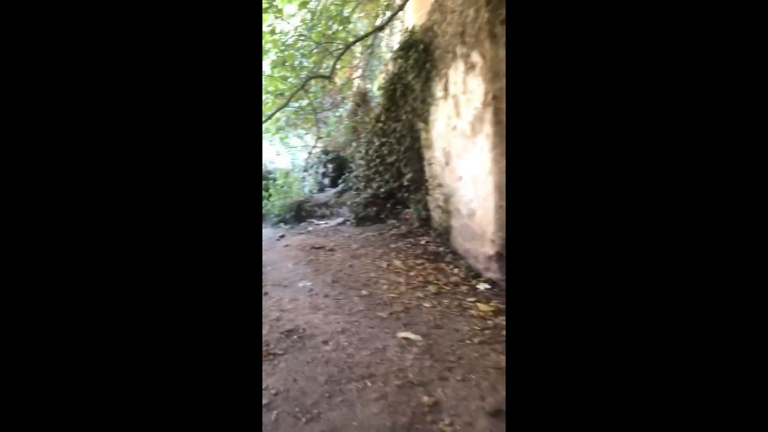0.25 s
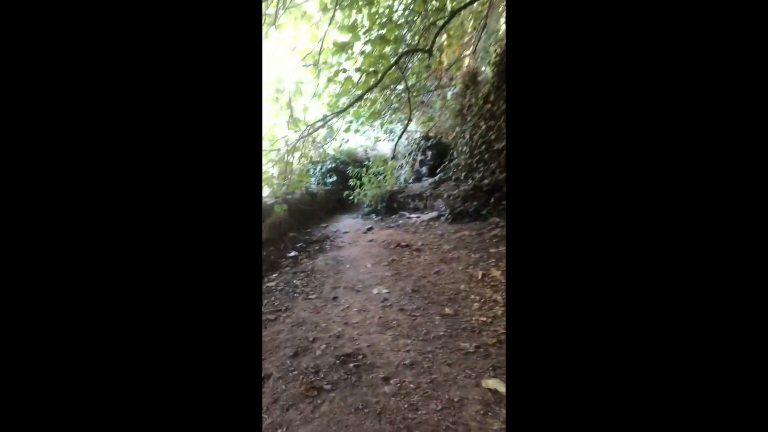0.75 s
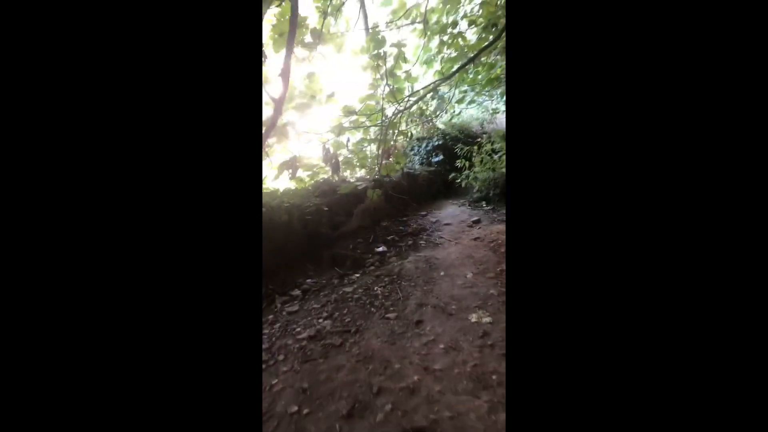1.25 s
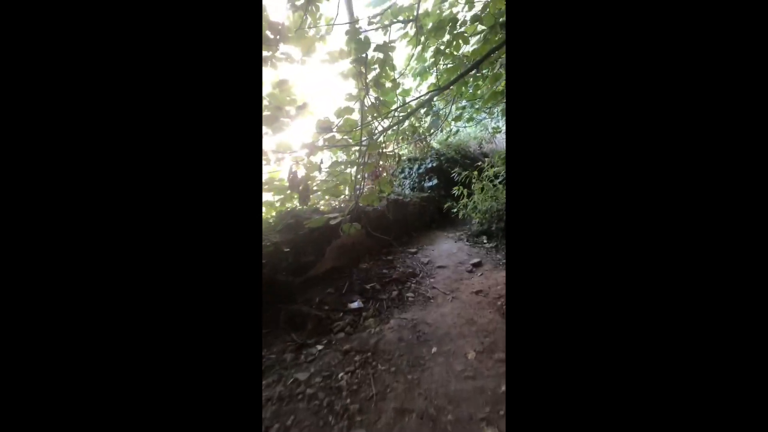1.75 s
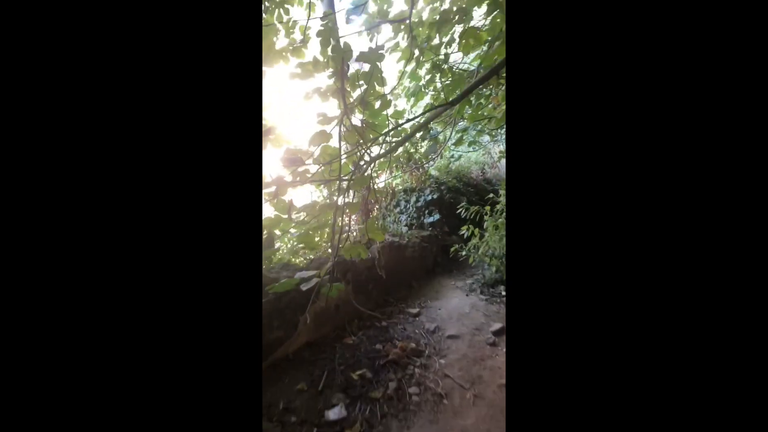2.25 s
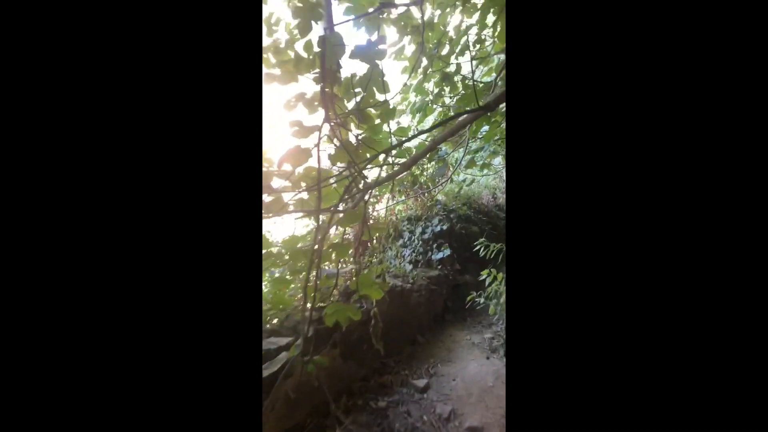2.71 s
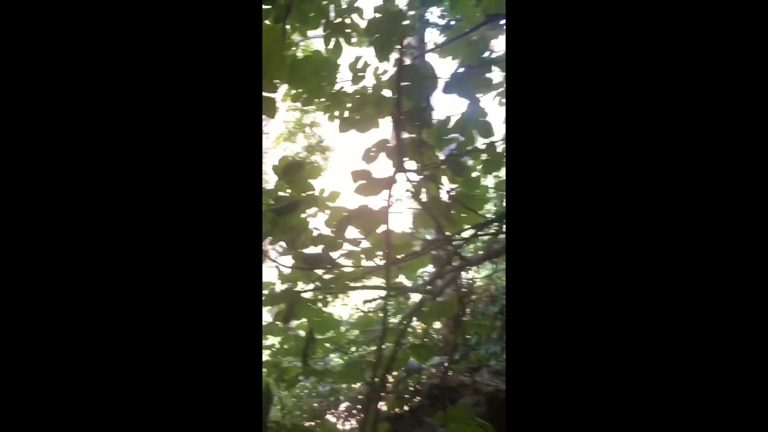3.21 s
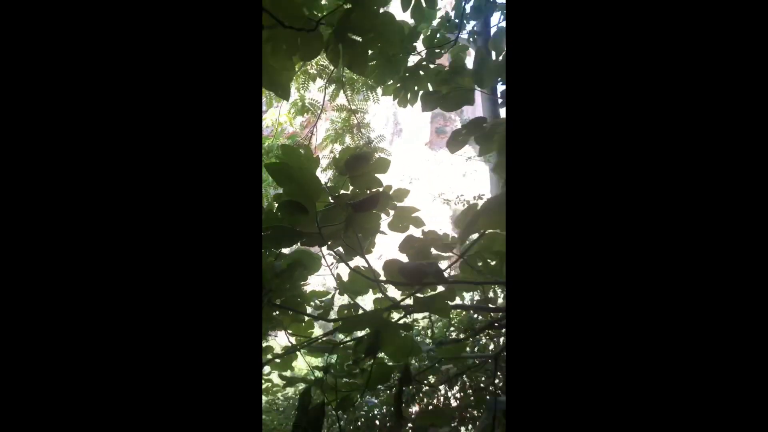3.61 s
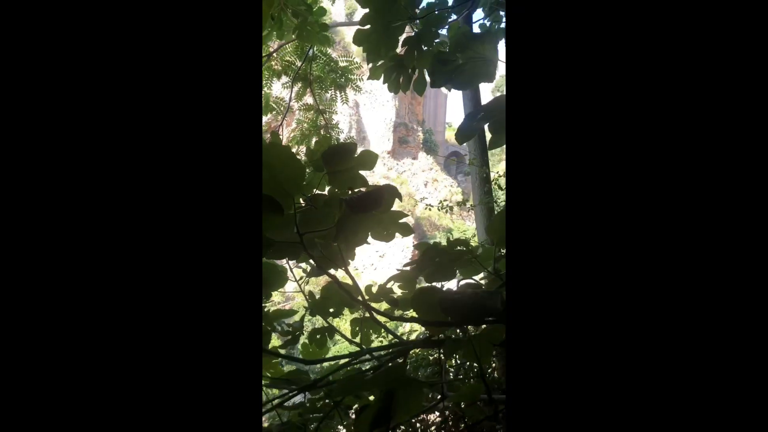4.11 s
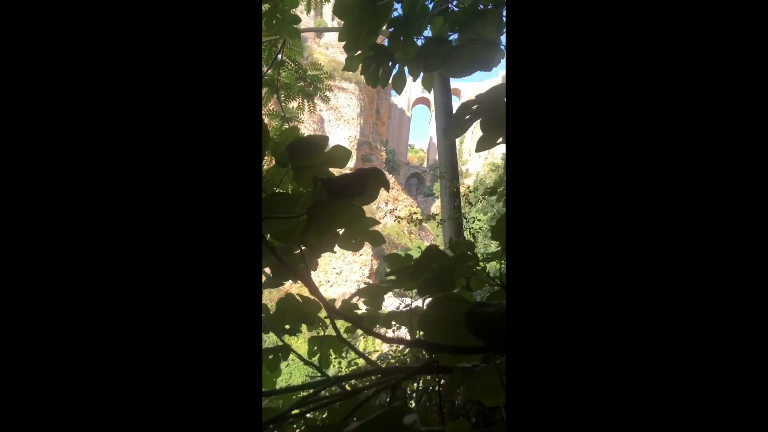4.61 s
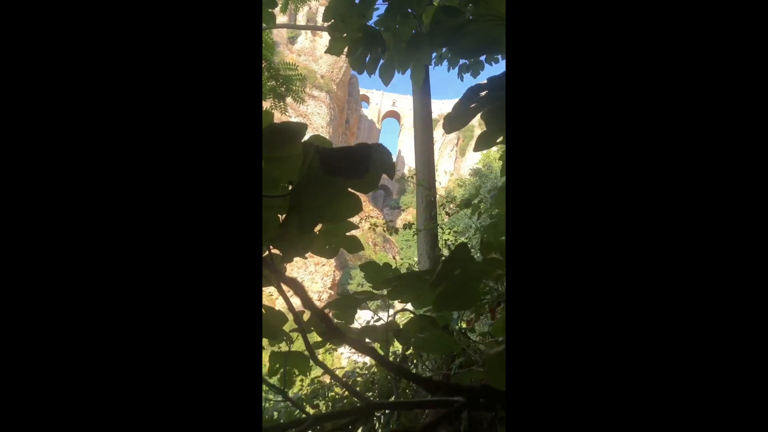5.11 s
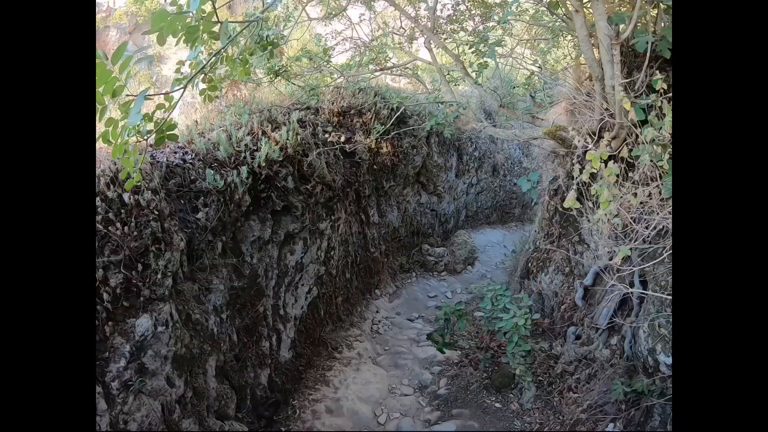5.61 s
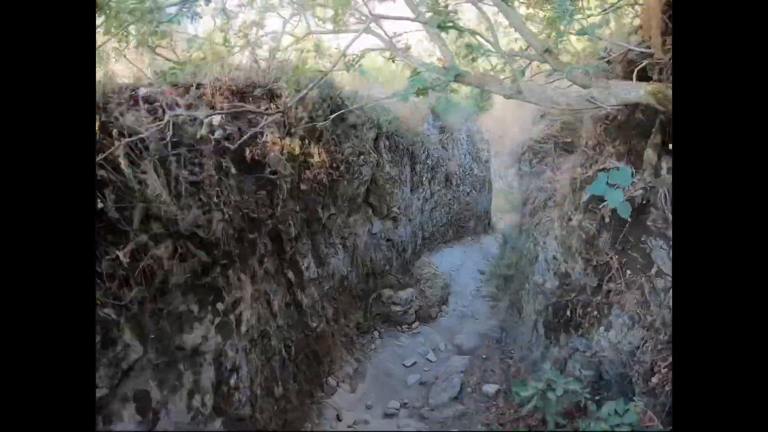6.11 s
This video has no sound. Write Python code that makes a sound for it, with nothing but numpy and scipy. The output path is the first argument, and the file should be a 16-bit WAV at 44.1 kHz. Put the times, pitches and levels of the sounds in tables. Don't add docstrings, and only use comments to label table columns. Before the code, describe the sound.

Outdoors on a dirt path, a handheld microphone catches sparse scuffs and cracks of soles on grit and dry leaves. Wind and far falling water hiss steadily, growing louder. A faint bird peeps twice near one second, a twig snaps sharply near two, and a small metal ring rattles briefly before four seconds. One bright last clink is cut off by a quick fade into silence.

```python
import sys
import numpy as np
from scipy import signal
from scipy.io import wavfile
from scipy.ndimage import uniform_filter1d

SR = 44100
rng = np.random.default_rng(int(sys.argv[2]) if len(sys.argv) > 2 else 0)


def output_pcm(signal):
    pcm = np.clip(np.atleast_2d(signal).T, -1, 1) * 32767
    wavfile.write(sys.argv[1], SR, np.round(pcm).astype(np.int16))


def decibels_to_gain(level_db):
    exponent = np.asarray(level_db, float) / 20
    return 10 ** exponent


N = 280035


def evened(x):
    return x / np.sqrt(np.mean(x ** 2) + 1e-20)


def add(mix, start_s, sound):
    part = mix[round(start_s * SR):][:len(sound)]
    part += sound[:len(part)]


def crunch(level_db, centre_hz, octaves, length_ms):
    count = 4096
    per_ms = min(.33 * length_ms, 3.6)
    chance, size, sign = rng.random(count), rng.exponential(1, count), rng.random(count)
    rustle = rng.standard_normal(count)
    cracks = (chance < per_ms * 1000 / SR) * decibels_to_gain(3.5 * np.minimum(size, 3.5)) * np.sign(sign - .5)
    cracks = cracks + .25 * rustle
    cracks[0] += 3.0
    u = np.arange(count) * 1000 / SR / length_ms
    press = np.exp(-1.6 * u ** 1.5) * (.5 + .5 * np.minimum(4 * u, 1))
    edges_hz = np.clip(centre_hz * 2. ** (np.array([-.5, .5]) * octaves), 60, 19500)
    band = signal.butter(2, edges_hz, "bandpass", fs=SR, output="sos")
    sound = signal.sosfilt(band, cracks * press)
    sound = signal.lfilter([1], [1, -.55], sound)
    return decibels_to_gain(level_db) * sound / np.sqrt(np.sum(sound ** 2) / (length_ms * SR / 1000))


# start_s, level_db, centre_hz, length_ms
DIRT = [(.043, -53, 2500, 18), (.103, -54, 3000, 16), (.575, -58, 3000, 14), (1.485, -54, 6000, 5),
        (1.9185, -46, 5000, 2.2), (1.928, -53, 1900, 30), (1.99, -61, 7500, 45), (2.40, -57, 4000, 50),
        (2.897, -45, 350, 6), (5.653, -46, 3000, 6)]
LEAVES = [(.046, -61, 10500, 12), (.11, -57, 12000, 12), (.535, -53.5, 2500, 14), (1.03, -64, 9000, 10),
          (1.06, -55, 3000, 45), (1.075, -66, 12000, 25), (1.898, -53, 2300, 10), (1.911, -49, 1300, 9),
          (1.9165, -47, 2400, 6), (2.8935, -43, 1500, 1.5), (2.932, -52, 420, 28), (3.615, -54, 3000, 14),
          (3.622, -57, 8300, 22), (3.733, -59, 11500, 34), (3.805, -62, 11500, 35), (3.88, -60, 12500, 55),
          (3.955, -52, 8500, 3), (5.5915, -51, 13000, 1.2)]
GRIT = [(.13, -70, 14000, 30), (1.078, -54, 4800, 20), (3.62, -64, 14800, 35), (1.5, -66, 13000, 25),
        (1.59, -66, 14000, 6), (3.92, -56, 5300, 30), (1.996, -55, 6000, 22), (2.49, -64, 15000, 22),
        (3.736, -51, 7800, 6), (3.8205, -46, 6000, 1.8), (3.8725, -34, 5100, 1.2), (3.876, -51, 10500, 4),
        (4.801, -52, 14000, 1.8), (5.652, -41, 5300, 5), (5.6545, -37, 7000, 3), (5.6568, -41, 7000, 2.5)]


def footsteps():
    steps = np.zeros(N)
    for rows, octaves in ((DIRT, 2.3), (LEAVES, .95), (GRIT, .48)):
        for start_s, level_db, centre_hz, length_ms in rows:
            add(steps, start_s, crunch(level_db, centre_hz, octaves, length_ms))
    return steps


# start_s, peak_db, pitch_hz, ring_ms
SNAPS = [(.0475, -46, 1500, 2.5), (.052, -50, 4300, 2), (.107, -46, 1700, 2), (.1145, -47, 1900, 2.5),
         (.1142, -52, 11000, .8), (.121, -54, 13000, .8), (1.0885, -48, 3800, 3), (1.112, -46, 3100, 2),
         (1.9092, -28, 2100, 1.1), (1.9093, -48, 8300, 1), (1.9173, -38, 2000, 1.2),
         (1.9195, -32, 1850, 1.2), (1.9335, -42, 2100, 1.5), (1.947, -44, 2400, 1.5),
         (2.8695, -43, 1550, 2), (2.8935, -40, 2000, 1.5), (2.9005, -42, 750, 3), (3.6425, -50, 8300, 1.5),
         (3.744, -51, 11600, 1.2), (3.8155, -44, 3100, 2.5), (3.878, -48, 9800, 1.2)]


def snaps():
    snapping = np.zeros(N)
    t = np.arange(1000) / SR
    for start_s, peak_db, pitch_hz, ring_ms in SNAPS:
        u = t * 3200 / ring_ms
        add(snapping, start_s, decibels_to_gain(peak_db) * u * np.exp(1 - u) * np.sin(2 * np.pi * pitch_hz * t))
    return snapping


# pitch_hz, pair_split_hz, partner_share, t60_s
RING_MODES = [(5690, 80, .35, .1), (7895, 45, .6, .15), (11200, 40, .4, .05), (14890, 80, .2, .07)]


def clink(modes_db, pitch, until_s):
    t = np.arange(6000) / SR
    sound = np.zeros(len(t))
    for (hz, split_hz, share, t60_s), db in zip(RING_MODES, modes_db):
        lower = np.sin(2 * np.pi * hz * pitch * t)
        upper = share * np.sin(2 * np.pi * (hz * pitch + split_hz) * t)
        sound += decibels_to_gain(db - 60 * t / t60_s) * (lower + upper)
    onset = 1 - np.exp(-t / .0008)
    return sound * onset * np.clip((until_s - t) / .0008 + 1, 0, 1)


# start_s, level_db, rim_db (extra third mode when struck on the rim)
CLINKS = [(3.619, -46, 2.5), (3.626, -46, -4), (3.634, -56, 0), (3.752, -62, 0), (3.874, -43, -3),
          (3.8805, -43, 0), (3.887, -45, 13), (3.8955, -43, 3), (3.902, -54, 6), (3.913, -49, 0),
          (3.928, -53, 0), (5.652, -33, 0), (5.6566, -23.5, 0)]
# from_s, pitch_factor, then mode2_db, mode3_db, mode4_db against mode 1
HANGS = [
    (3.6, 1.009, -5.5, -15, -11),
    (3.7, 1.01, -.5, 6.5, -8),
    (3.85, .9925, -16, -17, -28),
    (5.6, 1.0005, -12.5, -33, -50),
]


def strap_ring():
    rattle = np.zeros(N)
    gaps_s = np.diff([row[0] for row in CLINKS], append=N / SR)
    for (start_s, level_db, rim_db), gap_s in zip(CLINKS, gaps_s):
        _, pitch, second_db, third_db, fourth_db = [hang for hang in HANGS if hang[0] < start_s][-1]
        modes_db = level_db + np.array([0, second_db, third_db + rim_db, fourth_db])
        add(rattle, start_s, clink(modes_db, pitch, gap_s))
    return rattle


# start_s, pitch_hz, level_db
PEEPS = [
    [(.9, 4320, -60), (.92, 4390, -57), (.942, 4480, -58)],
    [(.978, 4600, -59), (.99, 4450, -57), (1.006, 4280, -58)],
]


def bird():
    peeps = np.zeros(N)
    for rows in PEEPS:
        s, pitch_hz, level_db = np.transpose(rows)
        t = np.arange(s[0], s[-1], 1 / SR)
        tone = np.sqrt(2) * np.sin(2 * np.pi * np.cumsum(np.interp(t, s, pitch_hz)) / SR)
        add(peeps, s[0], decibels_to_gain(np.interp(t, s, level_db)) * tone * signal.windows.tukey(len(t), .3))
    return peeps


# start_s, body_db, shelter (from the rumble, up to 1; below 0
# adds rumble), boom_db (far), sky_db (openness)
HISS = [(0, -53, 0, 1, -.5), (.35, -53.6, 0, 2, 0), (.7, -52, .2, 1, 0), (1.05, -50.3, .3, -1, .5),
        (1.4, -50.8, .8, -1, .3), (1.7, -49.8, .9, 0, -1.3), (2.0, -49.5, .7, 2, -.3),
        (2.5, -49.5, .4, 2, .3), (3.0, -49.6, .2, -1, .3), (3.4, -47.8, 0, 0, -.6), (3.7, -47, .2, -1, 0),
        (4.0, -46.5, .15, 0, -.8), (4.3, -46, .1, -1, -.5), (4.7, -46.6, 0, -1, -.5),
        (5.0, -46.4, -.1, 1, 0), (5.3, -46.5, -.1, -2, 0), (5.7, -46.5, -.6, -5, 0)]
# pitch_hz, level_db (per Hz)
HISS_COLOUR = [(15, -62), (28, -42), (50, -27), (80, -4.5), (130, -5), (250, -1), (500, -2.3), (900, -3.2),
               (1500, -5), (2800, -9), (5060, -12), (7500, -15.5), (10000, -21.6), (15800, -30.8)]


def hiss():
    frames, hz = N // 256 + 5, np.fft.rfftfreq(1024, 1 / SR)
    real, imaginary, patches = rng.standard_normal((frames, 513, 3)).T
    patches = evened(uniform_filter1d(uniform_filter1d(patches, 14, 0), 12, 1))
    t = np.arange(frames) * 256 / SR - 512 / SR
    s, *columns = np.transpose(HISS)
    body_db, shelter, boom_db, sky_db = (np.interp(t, s, c) for c in columns)
    rumble_db = .7 - 3.1 * shelter
    fizz_db = -.1 + .4 * shelter + sky_db
    colour_hz, colour_db = np.transpose(HISS_COLOUR)
    colour = decibels_to_gain(np.interp(np.log(hz + 1), np.log(colour_hz), colour_db))
    colour /= np.sqrt(np.mean(colour ** 2))
    low = 1 / (1 + (hz / 560) ** 4)[:, None]
    deep = 1 / (1 + (hz / 130) ** 4)[:, None]
    high = 1 / (1 + (4200 / (hz + 1)) ** 3)[:, None]
    flicker_db = .35 * evened(uniform_filter1d(rng.standard_normal(frames), 5))
    deep_db = deep * boom_db + deep * .85 * (-46.5 - body_db)
    field_db = body_db + deep_db + (low - deep) * rumble_db + high * fizz_db
    field_db = field_db + .75 * patches + flicker_db
    z = (real + 1j * imaginary) * colour[:, None] * decibels_to_gain(field_db - 23.3)
    return signal.istft(z, nperseg=1024, noverlap=768, boundary=False)[1][512:N + 512]


def scene():
    near = footsteps() + strap_ring() + snaps() + bird()
    ground = decibels_to_gain(-12) * np.roll(near, round(.0031 * SR))
    wall = decibels_to_gain(-18) * np.roll(near, round(.0117 * SR))
    return np.tile(near + ground + wall + hiss(), (2, 1))


UNLIKE_S = [.2, .62, .8, 1.39, 1.41, 1.97, 2.06, 2.6, 2.62, 2.88, 3.13, 3.2, 3.25, 3.43, 3.57, 3.78, 3.99,
            4.27, 4.48, 4.55, 4.66, 4.75, 4.85, 5.08]


def unlike_treble(mono):
    low_hz, high_hz, band_hz, share = 4700, 15800, 1290, .2
    hz, s, z = signal.stft(mono, SR, nperseg=1024)
    band = np.clip((hz - low_hz) // band_hz + 1, 0, 10).astype(int)
    draw = rng.random((len(UNLIKE_S), 11))
    least = draw[:, 1:-1].min(axis=1, keepdims=True)
    chosen = (draw < share) | (draw == least)
    inside = (hz > low_hz) & (hz < high_hz)
    where = sum(np.outer(row[band] & inside, abs(s - at) < .0125) for at, row in zip(UNLIKE_S, chosen))
    unlike = abs(z) * where * np.exp(2j * np.pi * rng.random(z.shape)) * decibels_to_gain(-.7)
    side = signal.istft(unlike, SR, nperseg=1024)[1][:N]
    return side * np.array([[1], [-1]])


# start_s, end_s, residue_db (faint remainder), gone_s
FADE = (5.654, 5.6865, -50, 5.69)


def fade_out(sound):
    start_s, end_s, residue_db, gone_s = FADE
    return sound * np.interp(np.arange(N) / SR, [start_s, end_s, gone_s], [1, decibels_to_gain(residue_db), 0])


def top_cut(x):
    return signal.sosfilt(signal.butter(12, 15850, fs=SR, output="sos"), x)


def record(dry):
    edge = signal.firwin(511, 15840, window=("kaiser", 9), fs=SR)
    limited = signal.oaconvolve(dry + unlike_treble(dry[0]), edge[None], "same")
    bass_cut = signal.butter(3, 56, "highpass", fs=SR, output="sos")
    mix = fade_out(signal.sosfilt(bass_cut, limited))
    return top_cut(mix)


dry = scene()
out = record(dry)
output_pcm(out)
```